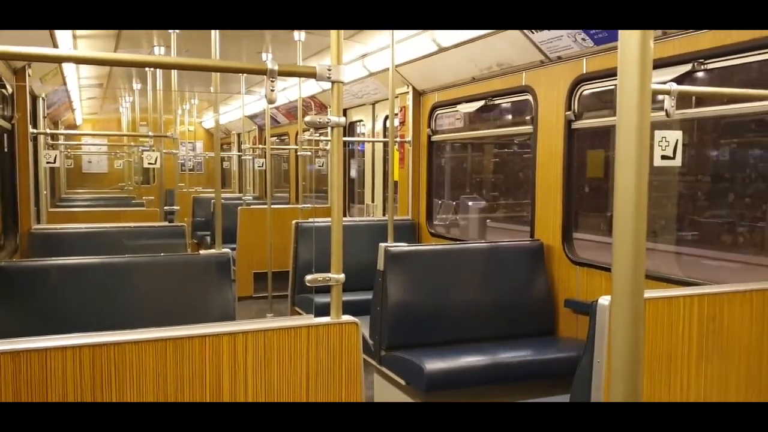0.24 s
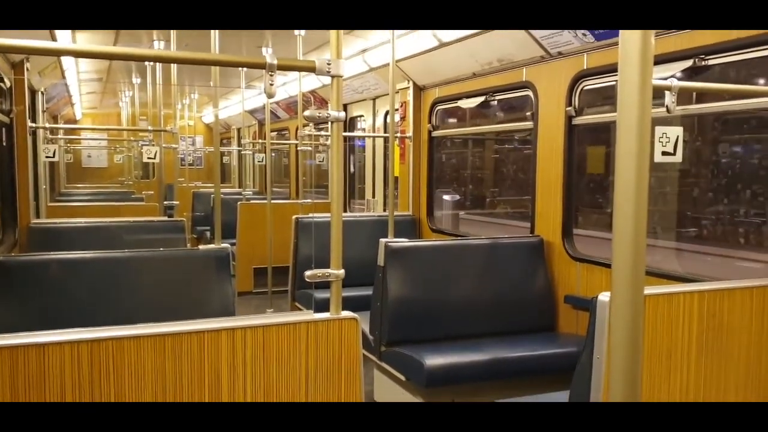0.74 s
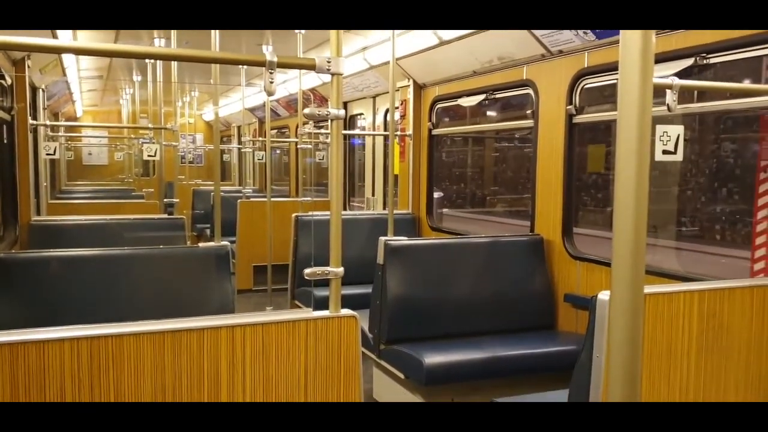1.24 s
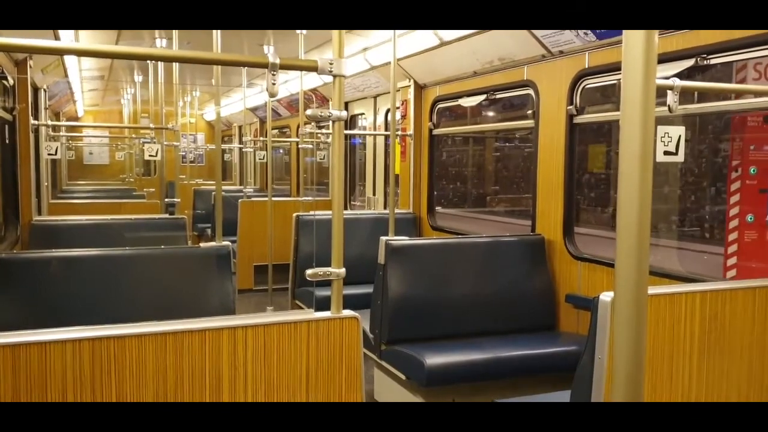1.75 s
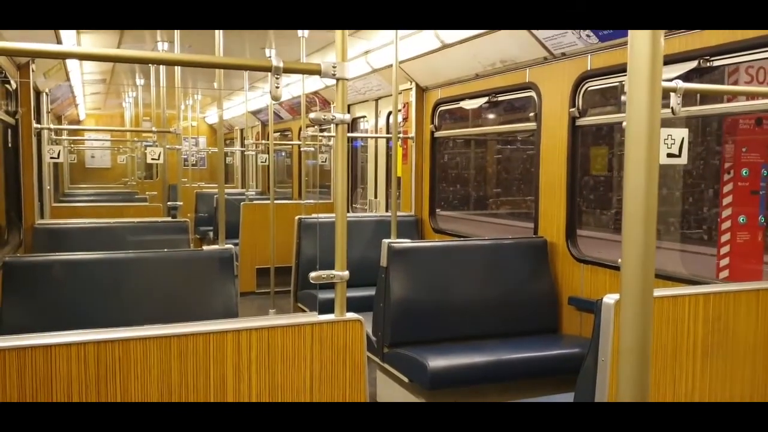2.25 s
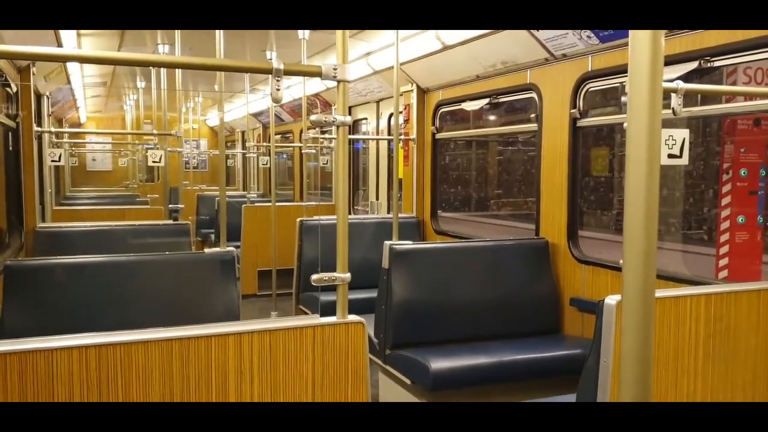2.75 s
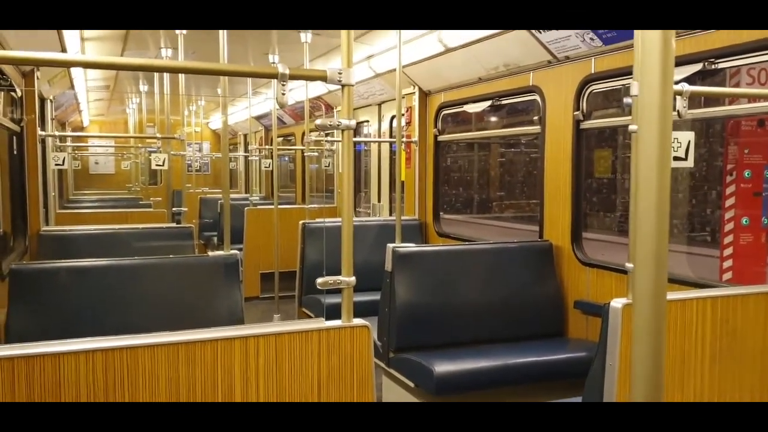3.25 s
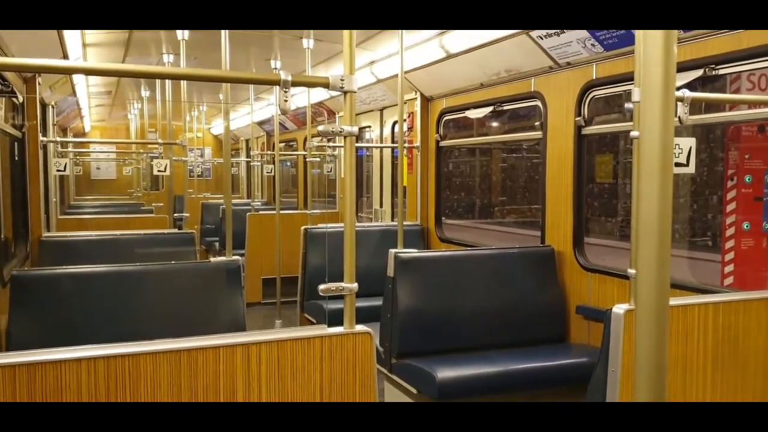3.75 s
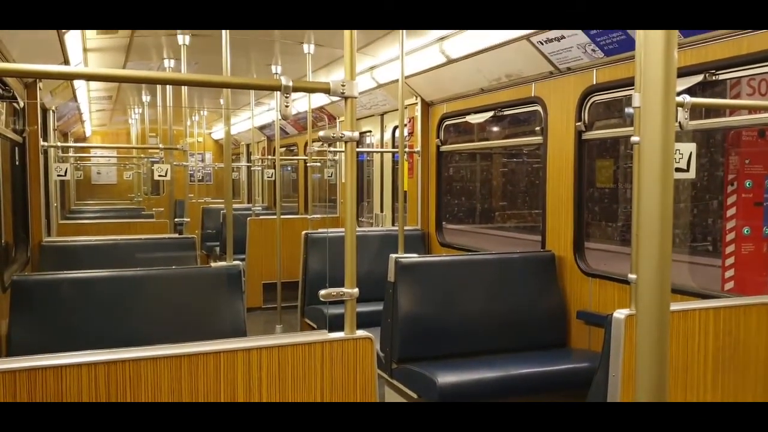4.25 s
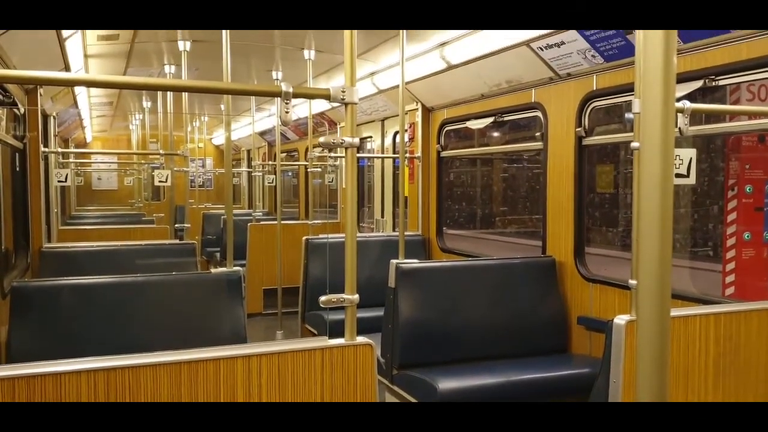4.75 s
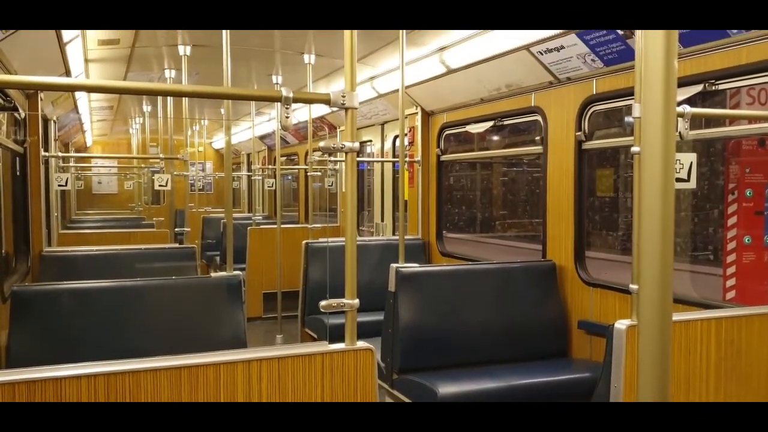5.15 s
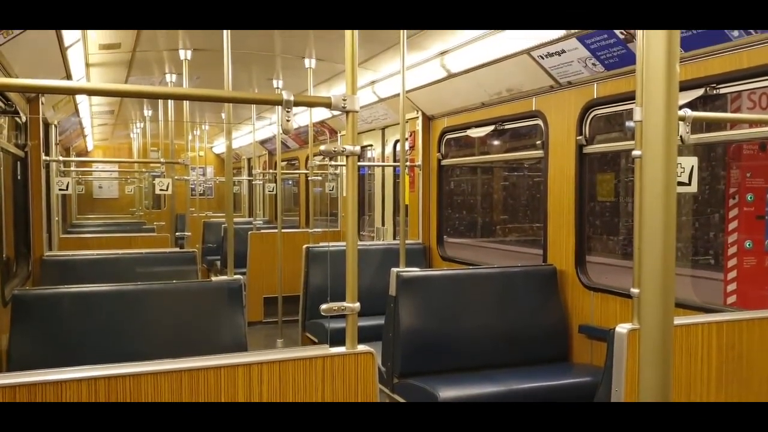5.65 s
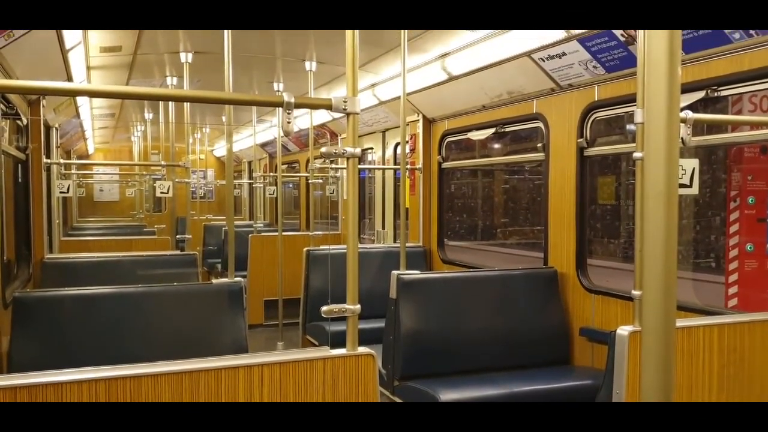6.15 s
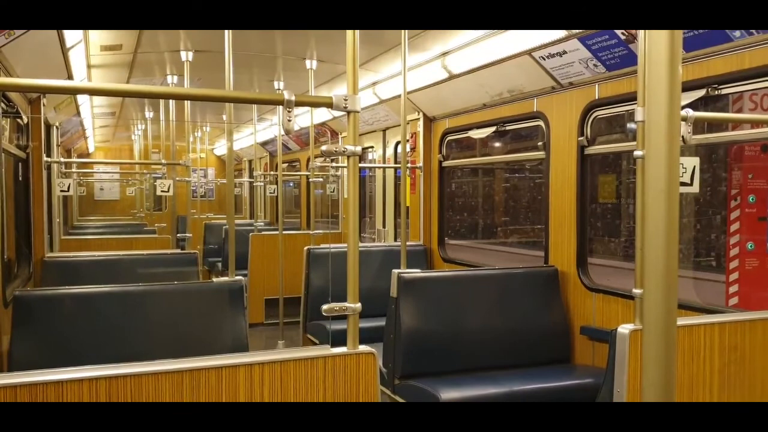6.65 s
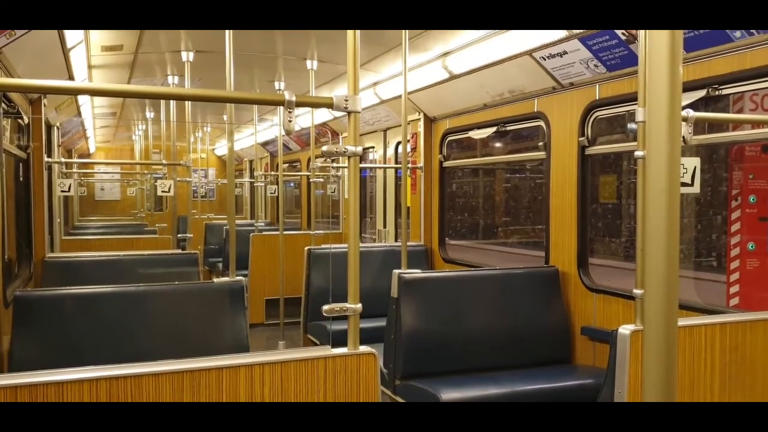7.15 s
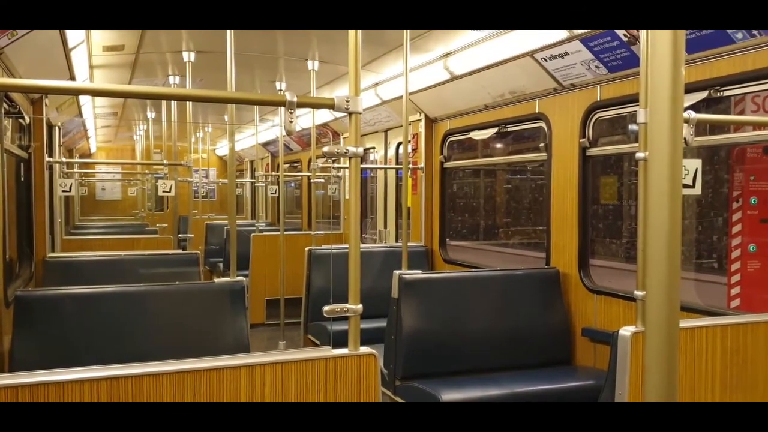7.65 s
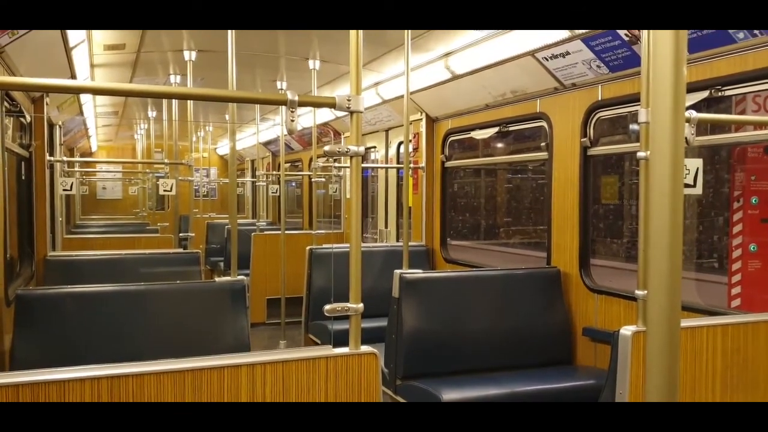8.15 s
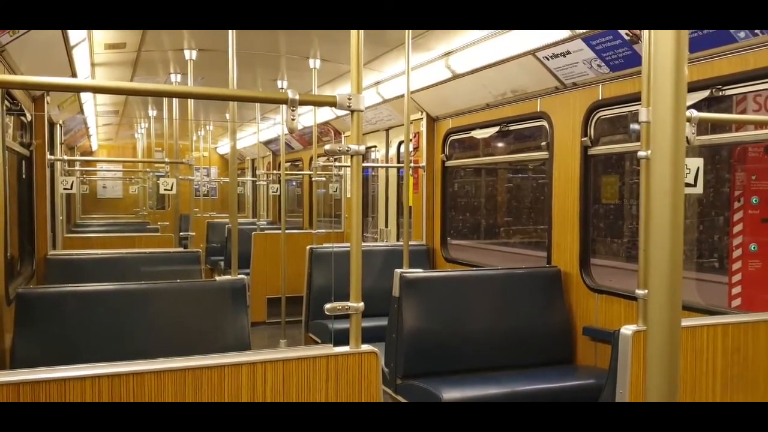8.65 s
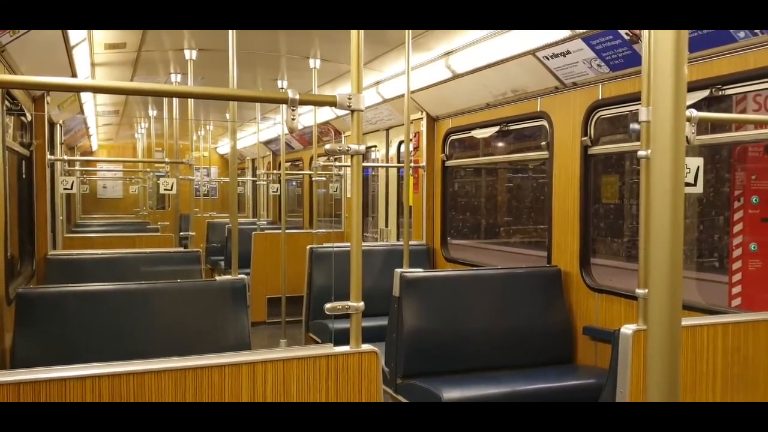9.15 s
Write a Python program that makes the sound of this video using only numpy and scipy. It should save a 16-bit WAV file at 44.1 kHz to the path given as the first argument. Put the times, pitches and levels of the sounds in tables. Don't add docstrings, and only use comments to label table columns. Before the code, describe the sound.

Inside a slowing train, low thumps and thin squeals end in a bright air dump and clank, leaving electric hum and ventilation wash.

```python
import sys
import numpy as np
from scipy import signal
from scipy.fft import rfft, irfft, next_fast_len
from scipy.io import wavfile

SR = 44100
rng = np.random.default_rng(int(sys.argv[2]) if len(sys.argv) > 2 else 0)


def master(y):
    cut = np.clip(np.atleast_2d(y).T, -1, 1)
    pcm = np.round(cut * 32767)
    wavfile.write(sys.argv[1], SR, pcm.astype(np.int16))


def level_to_linear(level):
    exponent = np.asarray(level, float) / 20
    return 10 ** exponent


N = 414099
TIME = np.arange(N) / SR
BINS = np.fft.rfftfreq(next_fast_len(N + 2048, True), 1 / SR)

# f/Hz, left-right correlation
PORT_LIKENESS = [(60, .995), (190, .99), (290, .4), (640, .3), (1400, -.1), (3000, 0), (16000, 0)]
# f/Hz, left minus right level/dB
PORT_TILT = [(28, -5), (60, -1.7), (200, -2), (380, 0), (700, -4), (1600, -4), (2700, -8), (4000, -4),
             (7000, -14), (8300, 2), (9000, 0), (11400, -15), (13000, -10), (14000, -5)]
# f/Hz, lead/rad
PORT_LEAD = [(28, .6), (60, .4), (110, .2), (170, .3), (250, .1), (290, 1.8), (335, 1.5), (362, .45),
             (900, 1.5)]
NOTCH_HZ, NOTCH_WIDTH_HZ, NOTCH_DB = 8280, 270, -5
BAND_LIMIT_HZ = 15730

# t/s, level/dB
BED_LEVEL = [(0, -33), (1, -35.5), (2.08, -36.5), (2.6, -38.5), (3.5, -39), (4.6, -39.5), (5, -36.5),
             (5.4, -34.5), (9.39, -34)]
# t/s, rate/(turns per s)
SHAFT_RATE = [(0, 27.78), (2, 27.79), (3, 27.81), (5, 27.8), (6.4, 27.77), (6.9, 27.82), (7.5, 27.94),
              (8.6, 27.94), (9.39, 27.9)]
# shaft order, level/dB
SHAFT_ORDERS = [(1, -19), (2, -13), (3, -1), (4, -13), (5, -26), (6, 0), (7, -29), (8, -21), (9, -23),
                (10, -23), (11, -22), (12, -16), (13, -13), (15, -30), (16, -31),
                (23, -34), (25, -31), (26, -31), (28, -32), (31, -35), (36, -36), (37, -36), (41, -37),
                (46, -39), (48, -39)]
STOP_S, LOADED_SWING_DB, IDLE_SWING_DB = 3, 6.5, -0.5

# f/Hz, density/(dB per Hz)
LOW_WASH = [(20, -34), (38, -16), (55, 10), (75, 5.5), (100, -1), (160, 2), (200, -6), (300, -3),
            (380, -13), (460, -5), (540, -13), (620, -49), (900, -52)]
# f/Hz, density/(dB per Hz)
HIGH_WASH = [(400, -5), (600, 0.5), (1700, -2), (2600, -9), (3100, -9.5), (4000, -20), (7000, -18),
             (8200, -27.5), (8600, -20), (10000, -27), (11400, -29), (13000, -33), (13400, -60),
             (16000, -67)]
# f/Hz, width/Hz, level/dB
FAN_PEAKS = [(53, 11, -9), (152.9, 0.66, -18), (297, 14, -16.5), (303, 53, -10.5), (381.4, 21, -14),
             (406.3, 1.8, -19)]
# f/Hz, level/dB
FAN_CORES = [(288.6, -9), (370.5, -14.5)]
# t/s, level/dB
FAN_LEVEL = [(0, -10), (2.5, -3), (5, -3), (6.9, -6), (7.3, -1.5), (9.39, -1.5)]
# f/Hz, width/Hz, level/dB
DUCT_WHISTLES = [(775, 144, -26.5), (2040, 280, -29.5), (5050, 60, -54.5), (6650, 60, -41.5),
                 (7100, 17, -43.5), (9250, 12, -54), (11350, 300, -45.5)]

# t/s, length/s, rumble level/dB, panel knock level/dB
RAIL_JOINTS = [(0, 0.21, -34.5, -53), (.205, 0.054, -28, -35), (.42, 0.074, -29.5, -52),
               (.585, .14, -28.5, -35), (.76, 0.097, -27, -43.5), (.96, .1, -27.5, -43.5),
               (1.055, .02, -27.5, -36.5), (1.17, 0.055, -39, -61), (1.36, 0.065, -46, -56),
               (1.7, 0.16, -41, -60), (1.92, 0.098, -47, -62)]
# f/Hz, density/(dB per Hz)
RAIL_COLOUR = [(20, -17), (40, -5.5), (65, -4), (100, -5.5), (140, -15.5), (180, -15), (260, -8),
               (330, -17), (460, -18.5), (580, -22.5), (900, -7.5), (2400, -29), (3700, -67), (6000, -60)]
THUMP_RISE_S, THUMP_FALL_DB_PER_S, THUMP_WASH_DB = 0.015, 182, -31
# t/s, length/s, rumble level/dB, panel knock level/dB
GEAR_JOLTS = [
    (2.088, 0.036, -31, -26.5),
    (2.14, 0.017, -27, -33),
    (2.24, 0.053, -33, -39.5),
    (2.31, 0.12, -26.5, -34),
    (2.412, 0.065, -33, -30.5),
    (2.54, 0.086, -36, -44.5),
    (2.68, 0.024, -33, -55),
]
# f/Hz, density/(dB per Hz)
GEAR_COLOUR = [(20, -27), (53, 9), (110, -2), (160, -8.5), (210, -14), (300, -20.5), (540, -19), (720, -16),
               (1000, -15), (1400, -54), (1900, -50)]
JOLT_RISE_S, JOLT_FALL_DB_PER_S, JOLT_WASH_DB = 0.0096, 156, -10.5

# t/s, level/dB
SHOE_SQUEAL = [(.6, -59), (.89, -55.5), (.94, -49), (1.08, -49), (1.14, -47.5), (1.4, -51), (1.6, -56),
               (1.75, -52.5), (2.0, -52)]
SQUEAL_HZ, SQUEAL_CLIMB_HZ, SQUEAL_CLIMB_S = 1622, 22, .4
# t/s, level/dB
SHOE_RUB = [(.0, -64), (.45, -65), (1.7, -66), (2.0, -70)]
# t/s, length/s, f/Hz, glide/Hz, level/dB
SHOE_CHIRPS = [(.03, 0.063, 2650, -7, -54.5), (.38, .08, 2430, 20, -61), (.46, 0.15, 2450, -74, -57),
               (.59, 0.041, 2620, 0, -56), (.71, 0.045, 2600, 20, -55), (.84, .05, 2630, 5, -60),
               (.95, 0.049, 2590, 20, -58), (1.02, 0.089, 2430, 39, -62), (1.13, 0.081, 2410, -22, -59),
               (1.23, .1, 2420, 0, -60), (1.33, 0.074, 2430, -22, -55), (1.43, .04, 2435, -3, -57),
               (1.47, 0.083, 2400, 180, -59), (1.58, .1, 2420, 3, -64), (1.6, .07, 2520, 20, -65),
               (1.73, 0.074, 2450, 85, -62), (1.88, .06, 2554, -2, -69), (1.96, .12, 2500, 67, -58)]

# t/s, open time/s, jet level/dB, body re jet/dB, edge fizz re jet/dB
AIR_VALVES = [
    (0.148, .004, -38.5, -2.5, -19),
    (.285, .015, -57.5, -14, 5),
    (.654, .01, -55.5, 2.5, -23),
    (2.085, .3, -29.5, -2.5, 0.5),
    (2.409, 0.0033, -32, 3, 2.5),
    (2.435, 0.0095, -41, 7.5, -12),
]
# f/Hz, density/(dB per Hz)
JET_COLOUR = [(710, -25), (1050, -9.5), (1710, -8.5), (2120, -6), (3260, -7), (3750, -8.5), (3960, -7),
              (5470, -1), (5900, 1.5), (6930, 2), (7470, 0), (8230, -11.5), (11900, -2), (15700, -14.5)]
JET_RISE_S, FIZZ_RISE_S = 0.017, .005
SAG_DB_PER_S, SHUT_DB_PER_S, FIZZ_SHUT_DB_PER_S = 16, 75.5, 116

# t/s, peak level/dB, thud re other modes/dB, share of full ring time
GEAR_SLAMS = [
    (2.094, -21, 17, 1),
    (2.4185, -6.5, -4, 1),
    (2.452, -18, 16, 1),
    (.161, -28, 8, 1),
    (3.839, -31, 28, .3),
    (3.86, -35, 28, .3),
]
# f/Hz, level/dB, t60/s
GEAR_MODES = [(165, 0.5, 0.22), (496, -1.5, 0.1), (713, -4, 0.073), (1014, -21, 0.027), (2020, -4, .03),
              (2500, 1, 0.014), (2531, 8.5, 0.028), (3030, -7, 0.025), (3400, -7, 0.06), (5820, -1, .03),
              (7200, -6, 0.033), (11320, 7, 0.025)]
TICK_DB, TICK_T60_S, SHRILL_RING = -4, .01, .6
ECHO_DB = -28

# t/s, half length/s, level/dB
SEAL_SEEPS = [
    (.52, 0.12, -61),
    (2.92, 0.23, -66),
    (8.63, 0.2, -63),
]
SEEP_BODY_DB = -3
# f/Hz, density/(dB per Hz)
BLEED_COLOUR = [(3000, -8), (4500, -8), (5080, -1.5), (5500, -6), (7000, -5.5), (8300, -22), (10000, -10.5),
                (11500, -6), (13000, -13), (16000, -14)]
LEAK_S, LEAK_RISE_S, LEAK_DB, LEAK_FIZZ_DB, LEAK_WAVER_DB = 5.12, 0.33, -65.5, -83, 2.1
RUSH_DB, RUSH_END_S, RUSH_FADE_S = 7.5, 5.6, .5
# t/s, level/dB
DOOR_SLIDE = [
    (9.22, -57),
    (9.262, -55),
    (9.278, -46),
    (9.39, -45),
]


def evened(x):
    return x / np.sqrt(np.mean(np.atleast_2d(x).mean(0) ** 2) + 1e-20)


def read(points, hz):
    f, value = np.transpose(points)
    return np.interp(np.log(hz + 1), np.log(f + 1), value)


def curves(rows, fade=.004):
    s, *columns = np.transpose(rows)
    gate = np.clip(np.minimum(TIME - s[0], s[-1] + 0.14 - TIME) / fade, 0, 1)
    return gate, [np.interp(TIME, s, c) for c in columns]


def drift(rate_hz, count=12):
    f, t = np.geomspace(rate_hz / 10, rate_hz, count)[:, None], TIME[::256]
    sines = np.sin(2 * np.pi * (f * t + rng.random((count, 1))))
    return np.interp(TIME, t, evened(sines.sum(0)))


def pair(colour):
    a, b, c, d = rng.standard_normal((4, len(BINS)))
    same = np.clip(read(PORT_LIKENESS, BINS), -1, 1)
    tilt_db = read(PORT_TILT, BINS) / 2
    left = a + 1j * b
    right = same * left * np.exp(-1j * read(PORT_LEAD, BINS)) + np.sqrt(1 - same ** 2) * (c + 1j * d)
    return np.array([left * level_to_linear(tilt_db), right / level_to_linear(tilt_db)]) * colour


def bands(points, edges_hz, levels_db):
    noise = pair(level_to_linear(read(points, BINS)))
    below = [1 / (1 + (BINS / edge) ** 8) for edge in edges_hz]
    shares = np.diff([0 * BINS] + below + [0 * BINS + 1], axis=0)
    out = 0
    for share, db in zip(shares, levels_db):
        out = out + evened(irfft(noise * share)[:, :N]) * level_to_linear(db + .7 * drift(14))
    return out


def fuzzy(modes):
    peaks = sum(level_to_linear(db) ** 2 / w / (1 + (2 * (BINS - f) / w) ** 4) for f, w, db in modes)
    total = np.sqrt(sum(level_to_linear(db) ** 2 for f, w, db in modes))
    return total * evened(irfft(pair(np.sqrt(peaks)))[:, :N])


def tone(hz):
    phase = 2 * np.pi * (np.cumsum(hz) / SR + rng.random())
    tilt_db, lead = read(PORT_TILT, np.mean(hz)) / 2, read(PORT_LEAD, np.mean(hz))
    return np.sqrt(2) * np.array([np.sin(phase + lead) * level_to_linear(tilt_db), np.sin(phase) / level_to_linear(tilt_db)])


def bursts(starts, lengths, levels_db, rise_s, fall_db_per_s, sag_db_per_s=0):
    age = TIME[::32] - np.reshape(starts, (-1, 1))
    length = np.reshape(lengths, (-1, 1))
    db = np.reshape(levels_db, (-1, 1)) - sag_db_per_s * np.clip(age, 0, length)
    db = db - fall_db_per_s * np.maximum(age - length, 0)
    power = (level_to_linear(db) * np.clip(age / rise_s, 0, 1) ** 2) ** 2
    return np.interp(TIME, TIME[::32], 10 * np.log10(power.sum(0) + 1e-12))


def machine(shaft_hz, swing_db):
    swing = {12: swing_db, 13: -swing_db}
    out = 0
    for order, db in SHAFT_ORDERS:
        hz = order * shaft_hz - .04 * db * drift(3)
        waver_db = (.4 - .11 * db) * drift(6)
        out = out + tone(hz) * level_to_linear(db + swing.get(order, 0) + waver_db)
    return out


def ventilation():
    wash = bands(LOW_WASH, [], [-6.0]) + bands(HIGH_WASH, [], [-15.0])
    core = sum(tone(hz + 1.17 * drift(2.5)) * level_to_linear(db + 2.3 * drift(7)) for hz, db in FAN_CORES)
    fans = (fuzzy(FAN_PEAKS) + core) * level_to_linear(curves(FAN_LEVEL)[1][0])
    return wash + fans + fuzzy(DUCT_WHISTLES)


def thumps(rows, colour, rise_s, fall_db_per_s, wash_db):
    s, length, rumble_db, knock_db = np.transpose(rows)
    rumble = bursts(s, length, rumble_db, rise_s, fall_db_per_s)
    knock = bursts(s, length, knock_db, rise_s, fall_db_per_s)
    return bands(colour, [165, 570], [rumble, knock, knock + wash_db])


def brakes():
    gate, (db,) = curves(SHOE_SQUEAL, fade=0.021)
    warming = np.exp(-np.maximum(TIME - SHOE_SQUEAL[0][0], 0) / SQUEAL_CLIMB_S)
    hz = SQUEAL_HZ - SQUEAL_CLIMB_HZ * warming
    out = gate * tone(hz + 3 * drift(29.2)) * level_to_linear(db + 2.0 * drift(22.13))
    gate, (db,) = curves(SHOE_RUB, fade=0.041)
    out = out + gate * fuzzy([(2420, 200, -1), (2520, 76, -7.0)]) * level_to_linear(db)
    for s, length, hz, glide_hz, db in SHOE_CHIRPS:
        u = np.linspace(0, 1, round(length * SR))
        wobble_hz = 25 * np.sin(2 * np.pi * (2.9 * u + rng.random()))
        swell = np.sqrt(np.sin(np.pi * u) + 1e-9)
        out[:, round(s * SR):][:, :len(u)] += level_to_linear(db) * tone(hz + glide_hz * u + wobble_hz) * swell
    return out


def valves():
    s, length, jet_db, body_db, fizz_db = np.transpose(AIR_VALVES)
    body = bursts(s, length, jet_db + body_db, JET_RISE_S, SHUT_DB_PER_S, .6 * SAG_DB_PER_S)
    jet = bursts(s, length, jet_db, JET_RISE_S, SHUT_DB_PER_S, SAG_DB_PER_S)
    fizz = bursts(s, length, jet_db + fizz_db, FIZZ_RISE_S, FIZZ_SHUT_DB_PER_S, 2.0 * SAG_DB_PER_S)
    return bands(JET_COLOUR, [3750, 8300], [body, jet, fizz])


def slams():
    t, out = TIME[:8000], np.zeros((2, N))
    for s, peak_db, thud_db, ring_share in GEAR_SLAMS:
        ring = np.diff(rng.standard_normal(len(t) + 1)) * level_to_linear(TICK_DB - 60 * t / TICK_T60_S)
        for f, db, t60 in GEAR_MODES:
            low = f < 1500
            decay_s = t60 * ring_share * (1 if low else SHRILL_RING)
            ring = ring + level_to_linear(db + thud_db * low - 60 * t / decay_s) * np.sin(2 * np.pi * f * t)
        echoes = rng.standard_normal((2, 3000)) * level_to_linear(ECHO_DB - 60 * t[:3000] / 0.055)
        echoes[:, 0] = 1
        hit = signal.fftconvolve(ring[None] * np.minimum(t / 0.0025, 1), echoes, axes=1)
        hit = hit / abs(hit.mean(0)).max()
        at = round((s - .002) * SR)
        out[:, at:at + hit.shape[1]] += level_to_linear(peak_db) * hit * level_to_linear([[-3], [3]])
    return out


def leaks():
    rush_db = RUSH_DB * np.clip(1 - (TIME - RUSH_END_S) / RUSH_FADE_S, 0, 1)
    opened = np.clip((TIME - LEAK_S) / LEAK_RISE_S, 0, 1) * level_to_linear(LEAK_WAVER_DB * drift(1.53) + rush_db)
    seep = sum(level_to_linear(db - 14 * ((TIME - s) / half) ** 2) for s, half, db in SEAL_SEEPS)
    hiss = opened * level_to_linear(LEAK_DB) + seep * level_to_linear(SEEP_BODY_DB)
    fizz = opened * level_to_linear(LEAK_FIZZ_DB) + seep
    bleed = bands(BLEED_COLOUR, [8300], [20 * np.log10(hiss + 1e-9), 20 * np.log10(fizz + 1e-9)])
    bleed = bleed + opened * fuzzy([(5090, 160, -79)])
    gate, (db,) = curves(DOOR_SLIDE, fade=.02)
    door = bands([(600, -25), (1000, 5), (1600, 2), (3300, -2.0), (5000, -34)], [], [db])
    return bleed + gate * door


def scene():
    shaft_hz = np.interp(TIME, *np.transpose(SHAFT_RATE))
    swing_db = np.interp(TIME, [STOP_S - .2, STOP_S + 0.14], [LOADED_SWING_DB, IDLE_SWING_DB])
    swing_db = swing_db + 1.6 * drift(1.29)
    steady = level_to_linear(curves(BED_LEVEL)[1][0]) * (machine(shaft_hz, swing_db) + ventilation())
    body = thumps(RAIL_JOINTS, RAIL_COLOUR, THUMP_RISE_S, THUMP_FALL_DB_PER_S, THUMP_WASH_DB)
    body = body + thumps(GEAR_JOLTS, GEAR_COLOUR, JOLT_RISE_S, JOLT_FALL_DB_PER_S, JOLT_WASH_DB)
    return steady + body + brakes() + valves() + slams() + leaks()


def low_pass(x):
    return signal.sosfilt(signal.butter(12, 16250, fs=SR, output="sos"), x)


def record(dry):
    notch = level_to_linear(NOTCH_DB * np.exp(-((BINS - NOTCH_HZ) / NOTCH_WIDTH_HZ) ** 2))
    response = notch * (BINS < BAND_LIMIT_HZ)
    padded = np.pad(dry, ((0, 0), (1024, 1024)), "reflect")
    heard = irfft(rfft(padded, 2 * len(BINS) - 2) * response)[:, 1024:1024 + N]
    return low_pass(heard * np.minimum(TIME / .002, 1))


dry = scene()
out = record(dry)
master(out)
```